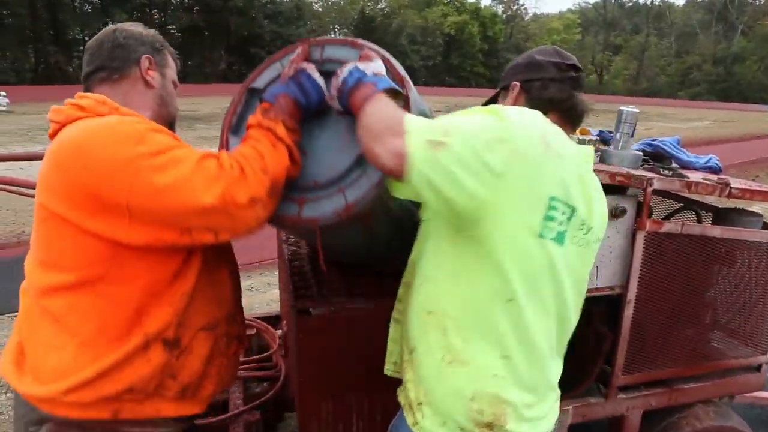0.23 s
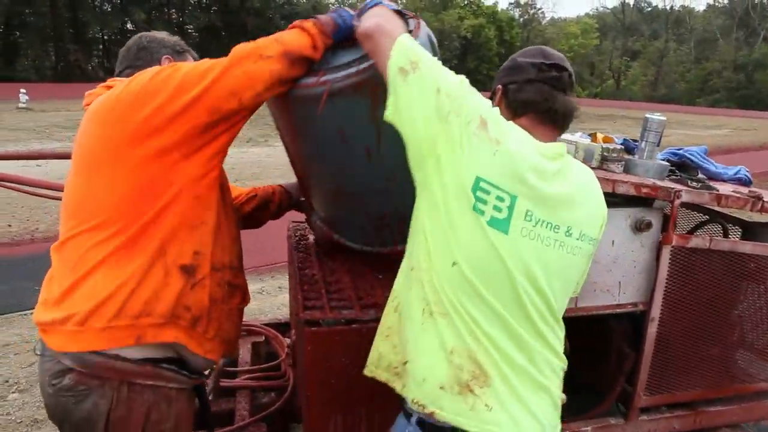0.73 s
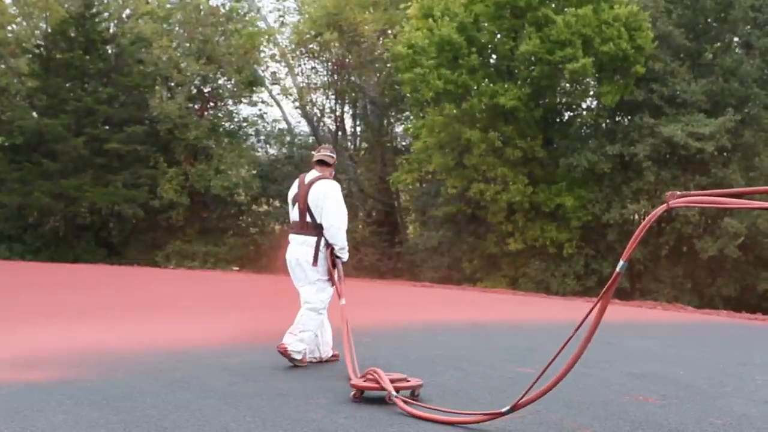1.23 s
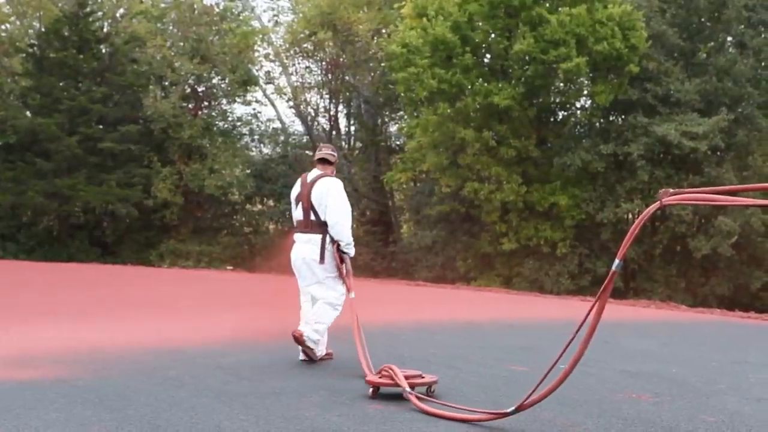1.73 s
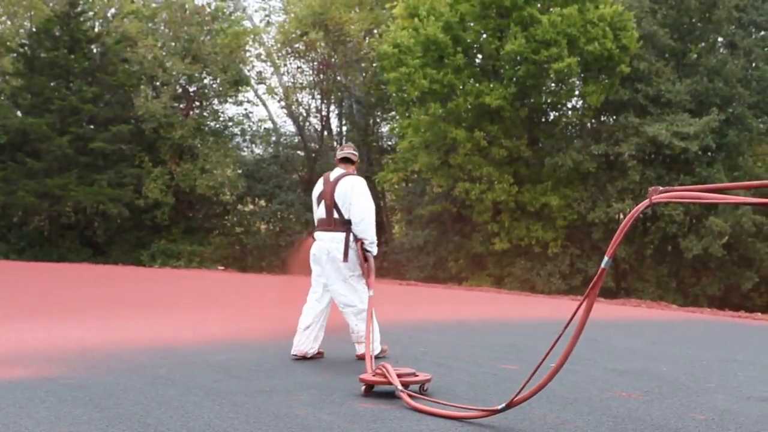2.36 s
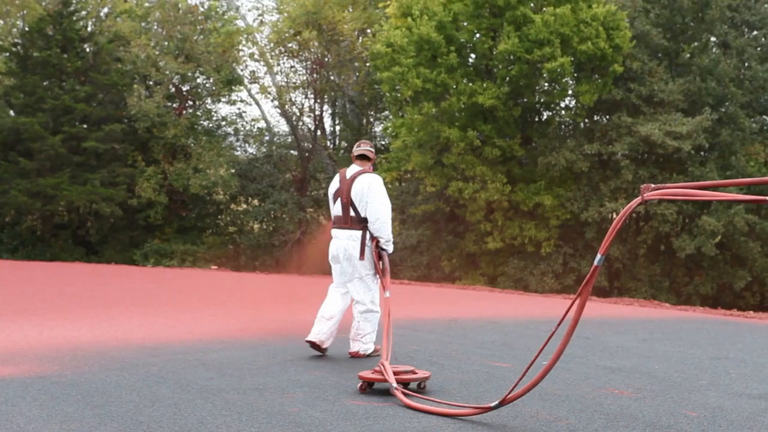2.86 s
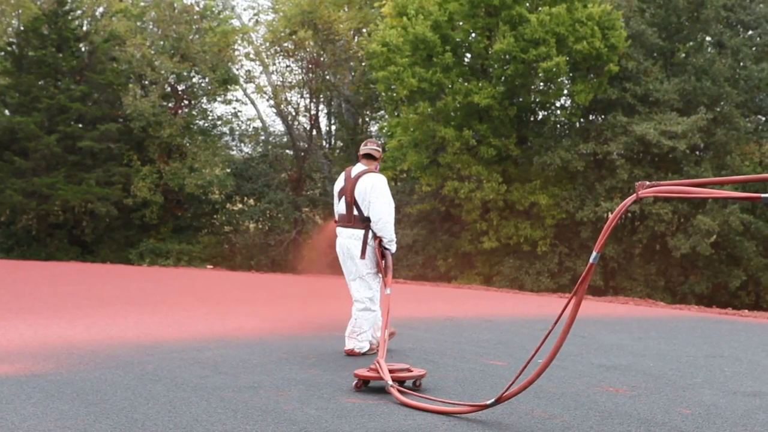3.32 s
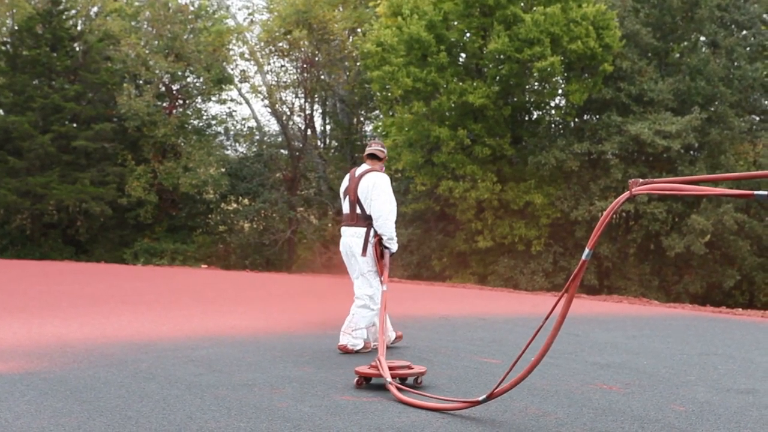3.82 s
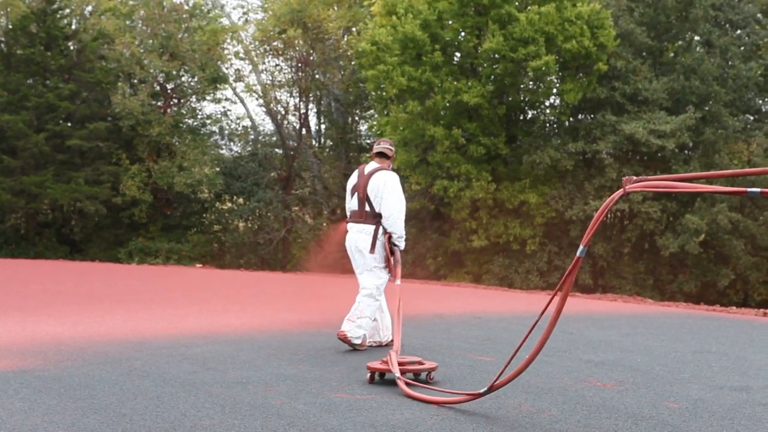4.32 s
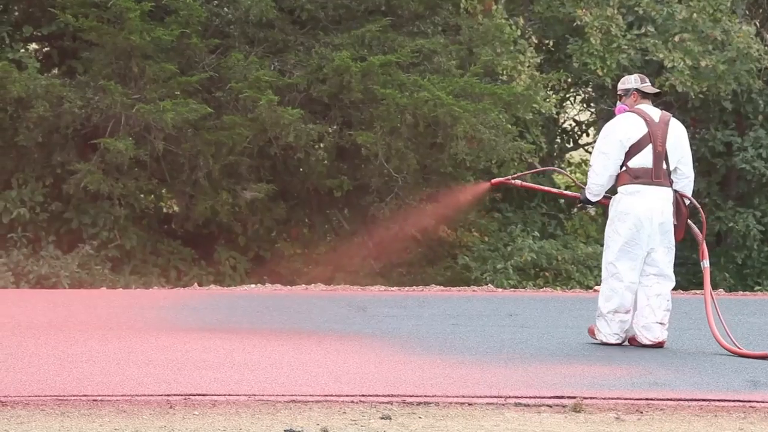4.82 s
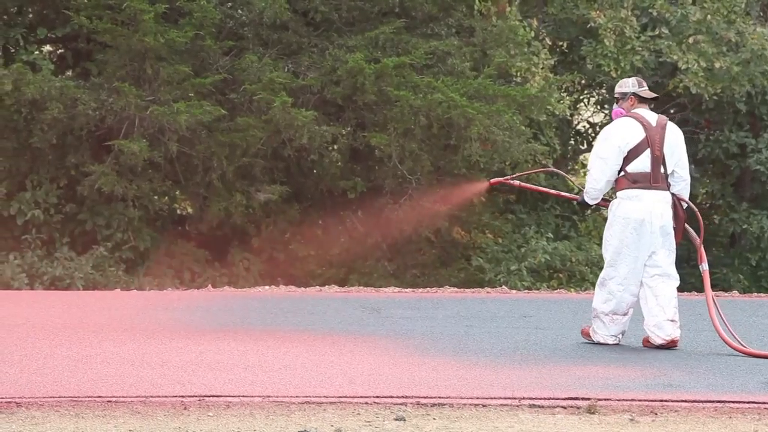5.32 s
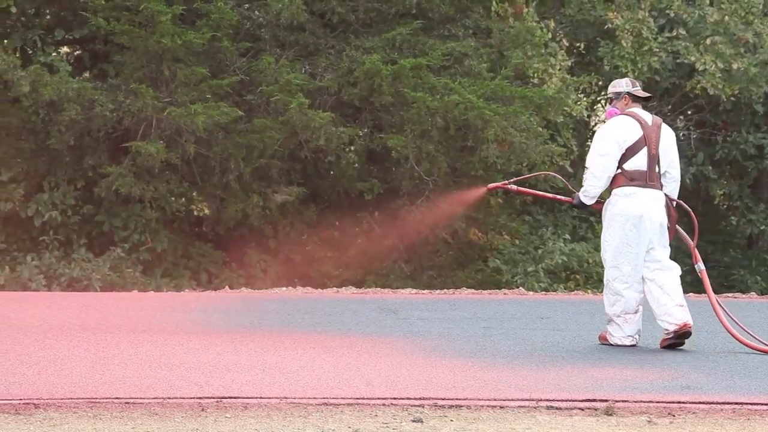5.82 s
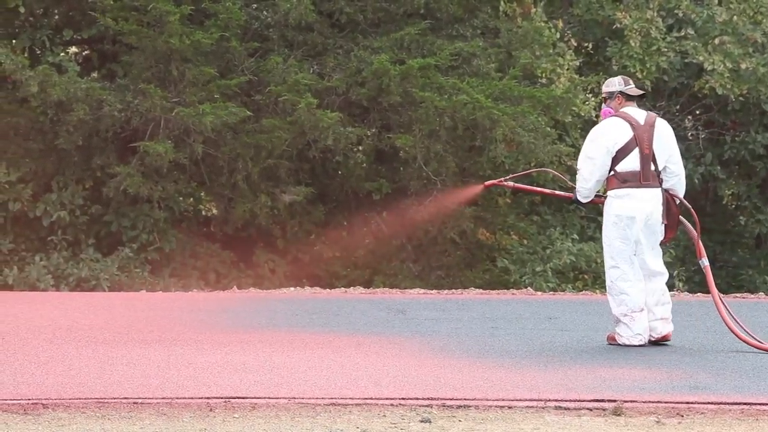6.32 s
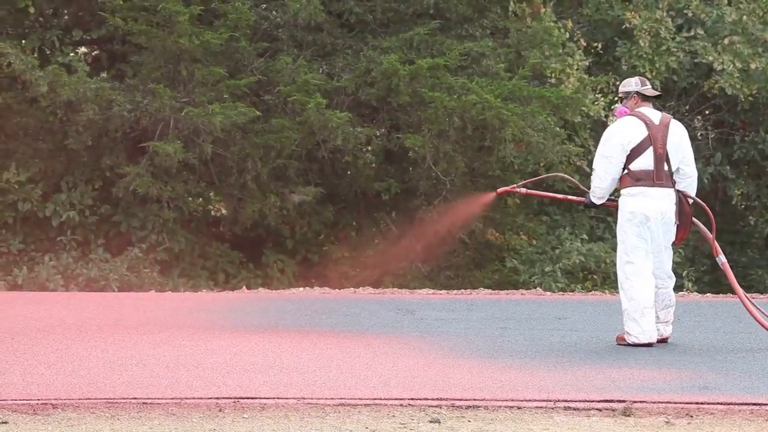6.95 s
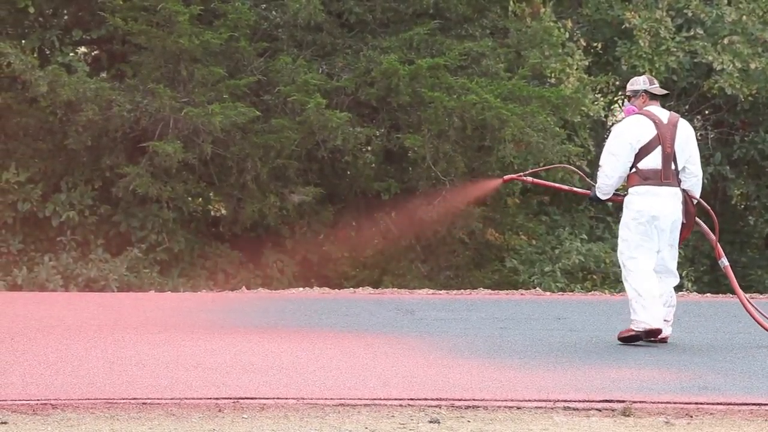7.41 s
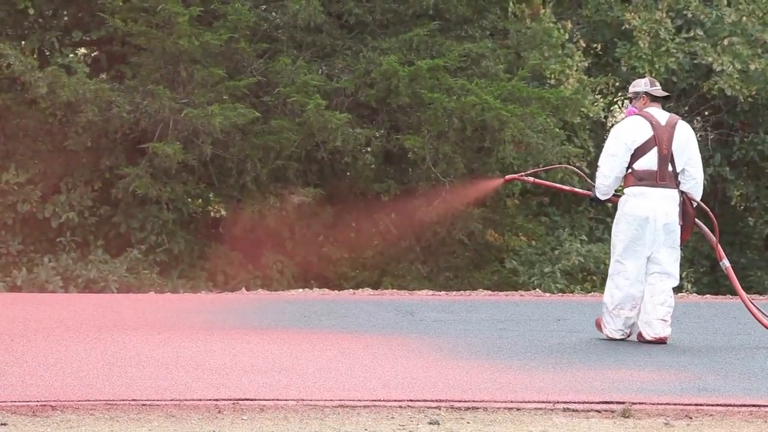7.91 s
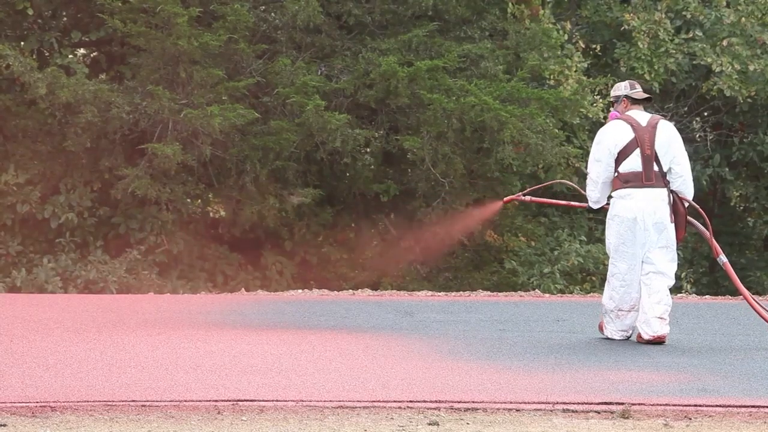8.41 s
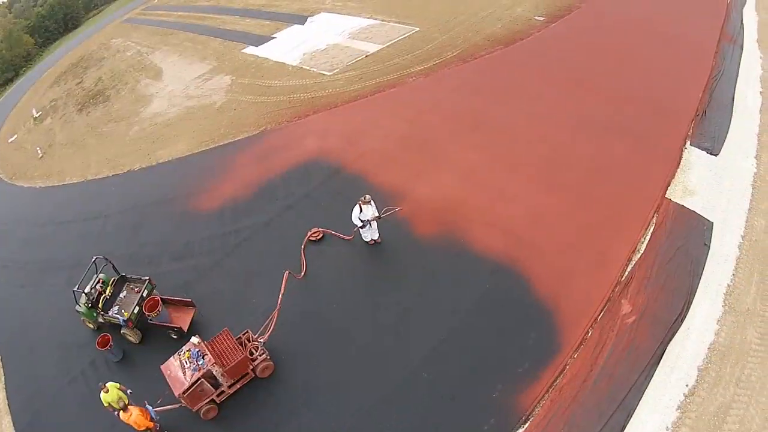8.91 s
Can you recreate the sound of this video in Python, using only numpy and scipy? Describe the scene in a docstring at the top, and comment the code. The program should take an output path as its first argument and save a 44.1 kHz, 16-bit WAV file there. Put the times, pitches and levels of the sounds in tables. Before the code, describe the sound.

Outdoors, a small two-cylinder engine idles close to the microphone for about a second, lumpy and knocking over a steady roar. It cuts to the engine at full speed some metres away, droning fast with faint hiss swelling behind it. Another cut brings a spray wand near, blowing bright, gritty, crackling air while the engine drones far off. It stops abruptly.

```python
"""Spray rig heard from three spots

A two-cylinder V engine idles close by, then runs at full speed with a spray wand hissing beyond it,
then drones far off while the near wand swings and blows wet rubber crumb over the ground.
The engine is a wavering low drone, ringing knocks and puffs of gas, with a roar of noise at the first
two spots; the wand is crackling noise whose colour moves. One microphone; the sound ends abruptly."""
import sys
import numpy as np
from scipy import signal
from scipy.fft import rfft, irfft, next_fast_len
from scipy.io import wavfile
from scipy.ndimage import uniform_filter1d

SR = 44100
rng = np.random.default_rng(int(sys.argv[2]) if len(sys.argv) > 2 else 0)


def field_ratio(decibels):
    """Amplitude ratio for a level in dB (20 dB per decade); scalars and array-likes work."""
    return 10 ** (np.asarray(decibels, dtype=float) / 20)


def log_audio(samples):
    """Write samples as a 16-bit WAV file to the path given in sys.argv[1]."""
    # one column per channel
    frames = np.atleast_2d(samples).T
    # limit to full scale, then quantise
    limited = np.clip(frames, -1, 1)
    pcm = np.round(limited * 32767).astype(np.int16)
    wavfile.write(sys.argv[1], SR, pcm)


N = 404397


def unit(x):
    """Scales x to an rms of 1."""
    return x / np.sqrt(np.mean(x ** 2) + 1e-20)


def along(points, hz):
    """Reads (f/Hz, value) points on a log frequency axis."""
    f, v = np.transpose(points)
    return np.interp(np.log(hz + 1), np.log(f + 1), v)


def curves(rows, s):
    """Reads each column after the time at the times s."""
    t, *columns = np.transpose(rows)
    return [np.interp(s, t, column) for column in columns]


def filtered(x, response):
    """Multiplies the spectrum of x by a response, a function of frequency."""
    m = next_fast_len(len(x) + 8192)
    return irfft(rfft(x, m) * response(np.fft.rfftfreq(m, 1 / SR)), m)[:len(x)]


def coloured(x, spectrum):
    """Shapes x by a table of relative levels, then scales it to an rms of 1."""
    return unit(filtered(x, lambda hz: field_ratio(along(spectrum, hz))))


def bump(x, centre, width):
    """A bell of height 1 that falls to 1/e one width from its centre."""
    return np.exp(-((x - centre) / width) ** 2)


def roar(count, colour, loudness_db):
    """Steady roar of fan, pump and compressor: noise of a fixed colour."""
    return field_ratio(loudness_db) * coloured(rng.standard_normal(count), colour)


def jet(s, colour, shape_db, crackle_db, patchy_db):
    """Air jet noise that crackles with crumb, in drifting patches, under a colour that moves in time."""
    lumps = unit(uniform_filter1d(rng.standard_normal(len(s)), size=40))
    crackling = rng.standard_normal(len(s)) * field_ratio(crackle_db * lumps)
    air = coloured(crackling, colour)
    hz, t, z = signal.stft(air, SR, nperseg=512)
    # random levels, smoothed over frequency and then over time
    patches = uniform_filter1d(rng.standard_normal(z.shape), size=8, axis=0)
    patches = unit(uniform_filter1d(patches, size=14, axis=1))
    gain = field_ratio(patchy_db * patches + shape_db(hz[:, None], t + s[0]))
    return signal.istft(z * gain, SR, nperseg=512)[1][:len(s)]


def distant_wand(s):
    """The wand beyond the engine: a faint hiss that swells each time its beam swings past."""
    # relative colour of the distant jet: (f/Hz, level per Hz/dB)
    far_jet_colour = [(1500, -24), (3000, -1.5), (5000, -1.5), (6500, 5), (8500, -4), (10000, -12.5),
                      (13000, -21), (16000, -49)]
    # the beam swings past: (t/s, level/dB, half-length of the swell/s)
    swings = [(1.0, -32.5, .3), (1.6, -30.5, 0.35), (2.64, -26, 0.23), (3.4, -32, 0.34),
              (4.25, -29.5, 0.25)]
    between_swings_db, bright_hz = -35, 6350

    def shape_db(hz, t):
        """The swells add in power to the steady hiss, with one bright region on top."""
        energy = field_ratio(between_swings_db) ** 2
        for centre, swell_db, half_length in swings:
            energy = energy + (field_ratio(swell_db) * bump(t, centre, half_length)) ** 2
        return 10 * np.log10(energy) + 3 * bump(hz, bright_hz, width=1700)

    return jet(s, far_jet_colour, shape_db, crackle_db=1.5, patchy_db=2.0)


def near_wand(s):
    """The wand close by: its middle pitches are beamed, and a ground bounce carves a comb of dips."""
    # relative colour of the air jet: (f/Hz, level per Hz/dB)
    jet_colour = [(30, -51.5), (60, -29), (200, -21.5), (280, -16.5), (420, -28.5), (634, -24),
                  (945, -20.5), (1510, -11.5), (2400, -9.5), (3300, -6), (4080, -3.5), (6000, -3),
                  (7500, -2.5), (8800, -9), (10200, -23), (12200, -22.5), (14500, -35), (16000, -42.5)]
    # how the wand blows and points: (t/s, jet strength before aim/dB, aim at the listener/dB)
    wand = [(4.66, -37, 16.5), (4.9, -28, 3), (5.06, -28.5, 8), (5.67, -31, 10.5), (5.69, -35, 13.5),
            (5.72, -32.5, 8.5), (5.98, -29.5, 8), (6.31, -32, 13), (6.48, -33, 10), (6.6, -30.5, 8),
            (6.73, -33, 12), (7.05, -34, 13), (7.1, -37, 13), (7.24, -33.5, 9.5), (7.91, -31.5, 10),
            (7.92, -32.5, 9), (8.48, -31.5, 9), (8.56, -33.5, 13.5)]
    # the jet heard once more off the ground, as the wand rises and sinks:
    # (t/s, delay/ms, strength before the surface gain/0-1)
    bounce = [(4.66, 0.2, 0.4), (4.89, 0.24, 0.15), (5.12, 0.27, 0.4), (5.36, 0.27, 0.4),
              (5.59, .245, 0.33), (5.82, 0.25, 0.35), (6.05, 0.27, 0.4), (6.25, .292, 0.4),
              (6.4, 0.31, 0.4), (6.52, .29, 0.4), (6.63, .27, .4), (6.75, 0.25, .45), (6.87, 0.24, 0.37),
              (7.0, 0.23, 0.41), (7.21, .24, .3), (7.33, 0.24, 0.27), (7.56, .23, 0.31), (7.79, 0.25, .45),
              (7.91, .27, 0.37), (8.26, 0.27, 0.23), (8.57, .23, 0.47)]
    bounce_phase = 2.29  # radians: soft ground at a flat angle nearly turns the wave over
    smooth_gain, rough_above_hz = .9, 3340  # the grainy surface mirrors long waves better
    beam_from_hz, beam_to_hz, fizz_share, bright_hz = 3100, 10100, .6, 6830

    def shape_db(hz, t):
        """Low rush goes all round, the middle is beamed and the fizz above is beamed in part."""
        strength_db, aim_db = curves(wand, t)
        delay_ms, bounce_strength = curves(bounce, t)
        rush_part = 1 / (1 + (hz / beam_from_hz) ** 6)
        fizz_part = 1 / (1 + (beam_to_hz / (hz + 1)) ** 24)
        beamed = 1 - rush_part - (1 - fizz_share) * fizz_part
        beam_db = beamed * (aim_db - aim_db.mean())
        mirror = 1 + smooth_gain / (1 + (hz / rough_above_hz) ** 4)
        reflected = np.clip(bounce_strength * mirror, 0, .92)
        delay_phase = 2 * np.pi * hz * delay_ms / 1000
        comb_db = 20 * np.log10(abs(1 + reflected * np.exp(1j * (bounce_phase - delay_phase))))
        bright_db = 3.4 * bump(hz, bright_hz, width=590)
        return strength_db + aim_db.mean() + beam_db + bright_db + comb_db

    return jet(s, jet_colour, shape_db, crackle_db=2.0, patchy_db=0.5)


def drone(cycles, orders, gap, lag, sweep, waver_db):
    """Low multiples of the cycle rate, each wavering; twin firings a gap apart set their phases."""
    k, order_db = np.transpose(orders)[:, :, None]
    knots = rng.standard_normal((len(k), int(cycles[-1]) + 4))
    waver = np.array([np.interp(cycles, np.arange(len(row)) - 1, row) for row in knots])
    # lag is in cycles; sweep spreads the arrivals, in cycles per order
    phase = 2 * np.pi * k * (cycles - lag - sweep * k)
    phase = phase + np.angle(1 + np.exp(-2j * np.pi * k * gap))
    return unit(np.sum(field_ratio(order_db + waver_db * waver) * -np.sin(phase), axis=0))


def firings(cycles, lead, header_s, second_db, scatter_db, jitter_s):
    """One click per firing, the cylinders 270 and 450 degrees apart in turn, slightly uneven."""
    count = len(cycles)
    # a cycle is two crank turns, so 270 degrees is 3/8 of it
    turns = np.arange(-1, cycles[-1])[:, None] + lead + [0, 3 / 8]
    chance = rng.standard_normal((len(turns), 2, 2))
    at = np.interp(turns, cycles, np.arange(count), left=-SR, right=-SR)
    at += jitter_s * SR * chance[..., 0]
    at += [0, header_s * SR]  # the second cylinder has the longer header
    heard = at > 0
    size = field_ratio(scatter_db * chance[..., 1] + [0, second_db])[heard]
    # each click is shared between two samples to place it finely
    whole, part = np.divmod(at[heard], 1)
    whole = whole.astype(int)
    clicks = np.bincount(whole, size * (1 - part), count + SR)
    clicks += np.bincount(whole + 1, size * part, count + SR)
    return clicks[:count]


def gas_puffs(fire, blow_s):
    """Gas flow after each firing: the valve opens fast, the cylinder blows down for some milliseconds."""
    t = np.arange(SR // 20) / SR
    flow = (1 - np.exp(-t / 0.00091)) * np.exp(-(t / blow_s) ** 1.6)
    return signal.fftconvolve(fire, flow)[:len(fire)]


def pipe_knocks(fire, puff, pipe, rough, echo_s, echo):
    """Firings and turbulent gas ring the pipe and frame; the deck under the outlet sends one echo."""
    noise = filtered(rng.standard_normal(len(fire)), lambda f: f / (f + 600))
    turbulence = unit(puff * noise)

    def ringing(f):
        """The sum of all resonances, followed by the echo."""
        total = 0
        for centre, broad, peak_db in pipe:
            resonance = 1j * f * broad / (centre * centre - f * f + 1j * f * broad)
            total = total + field_ratio(peak_db) * resonance ** 2
        return total * (1 + echo * np.exp(-2j * np.pi * f * echo_s))

    return unit(filtered(unit(fire) + rough * turbulence, ringing))


def gas_rush(puff, gas):
    """Coloured noise let out in puffs, with its bass removed."""
    rush = coloured(puff * rng.standard_normal(len(puff)), gas)
    return filtered(rush, lambda f: f ** 3 / (f ** 3 + 1200 ** 3))


def engine(s, speed, lead, loudness, orders, pipe, gas, blow_s, second_db, scatter_db, jitter_s, rough,
           header_s, echo_s, echo, knock_db, gas_db, lag, sweep, waver_db):
    """Two cylinders firing unevenly make a drone; each firing rings the pipe and lets out gas."""
    cycles = np.cumsum(curves(speed, s)[0]) / SR
    fire = firings(cycles, lead, header_s, second_db, scatter_db, jitter_s)
    puff = gas_puffs(fire, blow_s)
    knocks = pipe_knocks(fire, puff, pipe, rough, echo_s, echo)
    rush = gas_rush(puff, gas)
    # time between the two firings, as a part of a cycle
    gap = 3 / 8 + header_s * cycles[-1] * SR / len(s)
    hum = drone(cycles - lead, orders, gap, lag, sweep, waver_db)
    # knocks and rush are set relative to the drone
    motor = hum + field_ratio(knock_db) * knocks + field_ratio(gas_db) * rush
    return field_ratio(curves(loudness, s)[0]) * motor


def close_idle(s):
    """Beside the idling engine: slow firings over a steady roar."""
    # engine cycles a second, one cycle is two crank turns: (t/s, rate/Hz)
    idle_speed = [(0.0, 16.618), (0.236, 17.02), (0.472, 16.745), (0.709, 16.794), (0.945, 17.077)]
    # loudness of the drone, which the other engine parts follow: (t/s, level/dB)
    idle_loudness = [(0, -25), (.3, -22.5), (.94, -23)]
    # relative strength of the drone's orders: (multiple of the cycle rate, level/dB)
    idle_drone = [(1, -41.5), (2, -28), (3, -18.5), (4, -25.5), (5, -2.5), (6, 1), (7, -14), (8, 0),
                  (9, -7.5), (10, -15.5), (11, -6.5), (12, -29.5), (13, -35.5), (14, -12), (15, -11),
                  (16, -18), (17, -9), (18, -10), (19, -19.5), (20, -8.5), (21, -6), (22, -14), (23, -19),
                  (24, -30), (25, -9.5), (26, -14.5), (27, -9), (28, -22), (29, -6.5), (30, -7), (31, -13),
                  (32, -6.5)]
    # resonances of pipe and frame that each firing knocks: (f/Hz, width/Hz, relative level/dB)
    idle_pipe = [(602, 70, 0.5), (684, 160, 2.5), (902, 60, 2), (963, 50, 7.5), (1182, 54, 8.5),
                 (1287, 58, 9), (1492, 92, 3.5), (1735, 92, 0), (2370, 150, 0.5)]
    # relative colour of the gas rush, then of the roar: (f/Hz, level per Hz/dB)
    idle_gas = [(200, -37.5), (500, 1), (1250, -13), (2400, -13.5), (3300, -17.5), (5500, -16),
                (6700, -9.5), (7800, -17.5), (9000, -26.5), (12000, -43.5), (16000, -65.5)]
    idle_roar = [(40, -35), (70, -10), (250, -4), (520, -10.5), (620, -16), (1250, -13.5), (3000, -23),
                 (6500, -15.5), (8800, -30.5), (11600, -26), (16000, -35)]
    motor = engine(s, idle_speed, 0.092, idle_loudness, idle_drone, idle_pipe, idle_gas,
                   blow_s=0.015, second_db=2.0, scatter_db=1.1, jitter_s=.00004, rough=.35,
                   header_s=0.00027, echo_s=0.00447, echo=0.14, knock_db=-4.5, gas_db=-0.5,
                   lag=0.076, sweep=0.0016, waver_db=-0.5)
    return motor + roar(len(s), idle_roar, -27)


def working(s):
    """The engine at full speed some metres away, the wand turned away behind it."""
    # engine cycles a second: (t/s, rate/Hz)
    work_speed = [(0.95, 27.2), (1.234, 27.215), (1.519, 27.247), (1.803, 27.228), (2.088, 27.229),
                  (2.372, 27.25), (2.657, 27.249), (2.941, 27.311), (3.226, 27.402), (3.51, 27.357),
                  (3.795, 27.207), (4.079, 27.173), (4.364, 27.053), (4.648, 27.046)]
    # loudness of the drone, which the other engine parts follow: (t/s, level/dB)
    work_loudness = [(0.95, -24.5), (1.94, -26), (4.64, -26)]
    # relative strength of the drone's orders: (multiple of the cycle rate, level/dB)
    work_drone = [(1, -39.5), (2, -13), (3, -3.5), (4, -21), (5, -1), (6, 3.5), (7, -7), (8, -20),
                  (9, -18.5), (10, -29.5), (11, -41.5), (12, -17), (13, -27), (14, -21), (15, -38),
                  (16, -10.5), (17, -35), (18, -12.5), (19, -25), (20, -39), (21, -26.5)]
    # resonances of pipe and frame: (f/Hz, width/Hz, relative level/dB)
    work_pipe = [(635, 88, -13), (710, 155, 5), (791, 120, 1), (1018, 61, -1), (1064.4, 79, 1.5),
                 (1570, 107, 5), (1824, 121, 5), (2137, 100, -6), (2294, 77, -5), (2786, 160, -1.5),
                 (3010, 130, -2), (3790, 200, -1), (4420, 200, 0.5), (5850, 230, -2.5)]
    # relative colour of the gas rush, then of the roar: (f/Hz, level per Hz/dB)
    work_gas = [(300, -48.5), (700, 3.5), (1800, -4), (2760, -2.5), (3300, -6), (4450, -7), (5300, -4.5),
                (6500, -0.5), (8500, -6.5), (10000, -16.5), (16000, -35)]
    work_roar = [(30, -35), (60, -11), (130, -3), (250, -7.5), (550, -7), (700, -8), (1000, -2.5),
                 (1820, -7.5), (5000, -8), (6500, -35), (11000, -89)]
    motor = engine(s, work_speed, .45, work_loudness, work_drone, work_pipe, work_gas,
                   blow_s=0.011, second_db=0.0, scatter_db=.5, jitter_s=.00002, rough=.22,
                   header_s=0.00034, echo_s=0.002802, echo=1.0, knock_db=-1.0, gas_db=0.8,
                   lag=0.1727, sweep=-0.00405, waver_db=0.3)
    return motor + distant_wand(s) + roar(len(s), work_roar, -32.5)


def spraying(s):
    """The wand near, the engine far."""
    # engine cycles a second: (t/s, rate/Hz)
    far_speed = [(4.655, 26.782), (5.089, 26.91), (5.523, 26.988), (5.957, 26.858), (6.391, 27.003),
                 (6.824, 26.96), (7.258, 27.006), (7.692, 26.98), (8.126, 27.033), (8.56, 27.147)]
    # loudness of the drone, which the other engine parts follow: (t/s, level/dB)
    far_loudness = [(4.66, -44), (5.15, -35.5), (5.65, -41.5), (5.95, -39.5), (6.94, -40.5), (7.12, -43.5),
                    (7.4, -41.5), (8.57, -40)]
    # relative strength of the drone's orders: (multiple of the cycle rate, level/dB)
    far_drone = [(1, -32.5), (2, -8), (3, -1.5), (4, -13), (5, 0.5), (6, -2), (7, -5.5), (8, -5), (9, -8),
                 (10, -13.5), (11, -14), (12, -9), (13, -18.5), (14, -16.5), (15, -31), (16, -32),
                 (17, -46.5), (18, -21), (19, -21.5), (20, -18), (21, -24)]
    # resonances of pipe and frame: (f/Hz, width/Hz, relative level/dB)
    far_pipe = [(644, 66, -0.5), (703, 60, -3.5), (780, 60, -0.5), (823, 58, -2.5), (1100, 250, -3.5)]
    # relative colour of the gas rush: (f/Hz, level per Hz/dB)
    far_gas = [(100, -12.5), (250, 29.5), (450, -38), (800, -17), (1500, 0.5), (3000, -18.5), (8000, -31)]
    motor = engine(s, far_speed, 0.1496, far_loudness, far_drone, far_pipe, far_gas,
                   blow_s=0.0019, second_db=-3.5, scatter_db=.3, jitter_s=.00004, rough=.1,
                   header_s=.0003, echo_s=0.0013, echo=0.47, knock_db=-8.5, gas_db=5.0,
                   lag=.225, sweep=-.012, waver_db=2.0)
    return motor + near_wand(s)


def scene():
    """The three spots, one after the other, from one microphone that feeds both channels."""
    # start of each listening spot, then the end of the last: (t/s)
    spot_times = [0, .938, 4.651, 8.571]
    out = np.zeros(N)
    for spot, begin, end in zip([close_idle, working, spraying], spot_times, spot_times[1:]):
        span = np.arange(round(begin * SR), round(end * SR))
        out[span] = spot(span / SR)
    return np.array([out, out])


def band_limit(x):
    """A steep low-pass at the top of the band."""
    return signal.sosfilt(signal.butter(12, 15850, fs=SR, output="sos"), x)


def record(dry):
    """Turns the scene into the finished sound, with nothing else mixed in."""
    return band_limit(dry)


dry = scene()
out = record(dry)
log_audio(out)
```